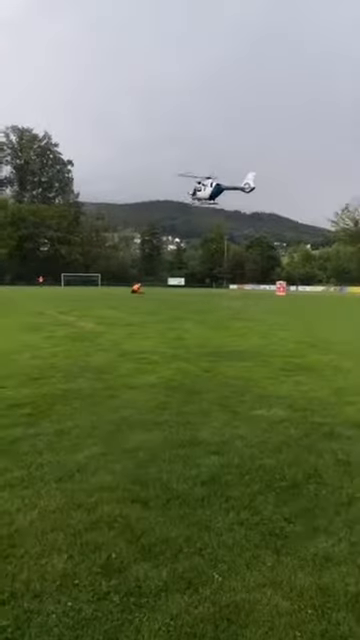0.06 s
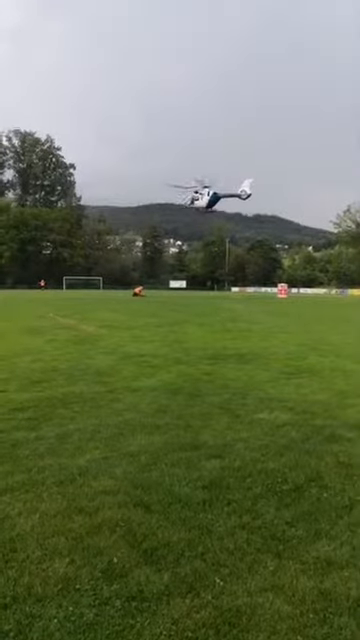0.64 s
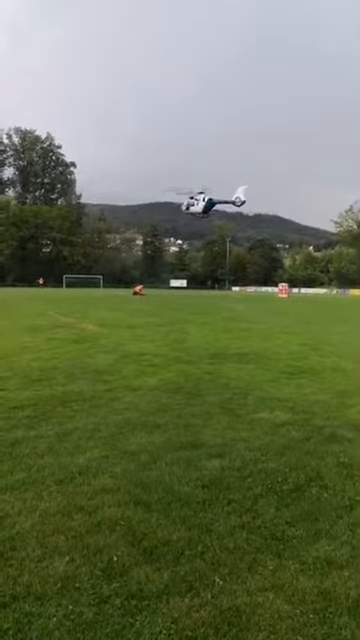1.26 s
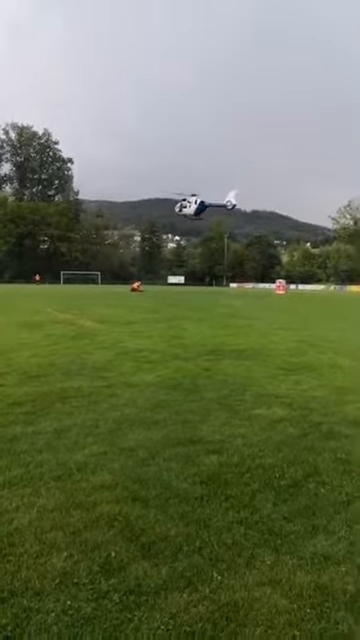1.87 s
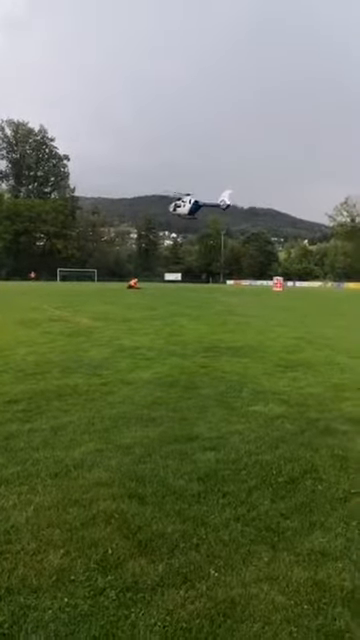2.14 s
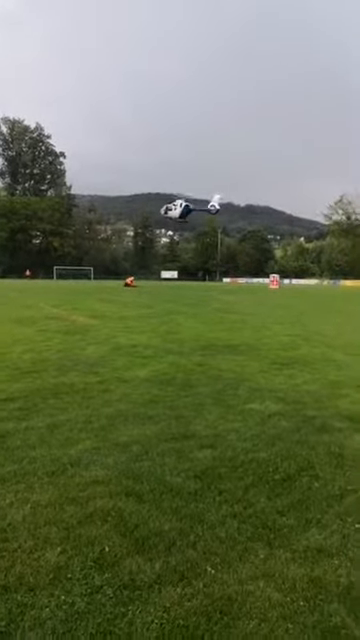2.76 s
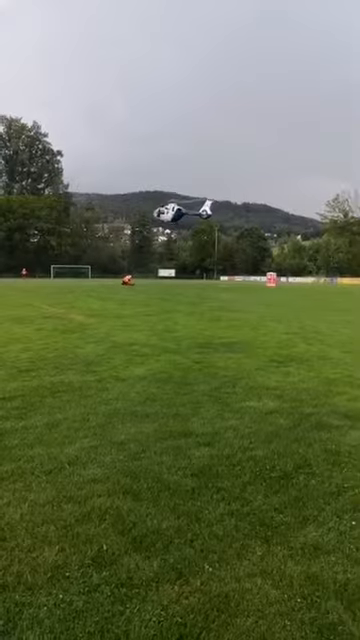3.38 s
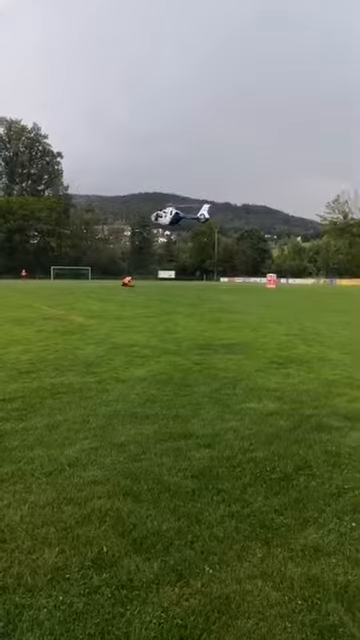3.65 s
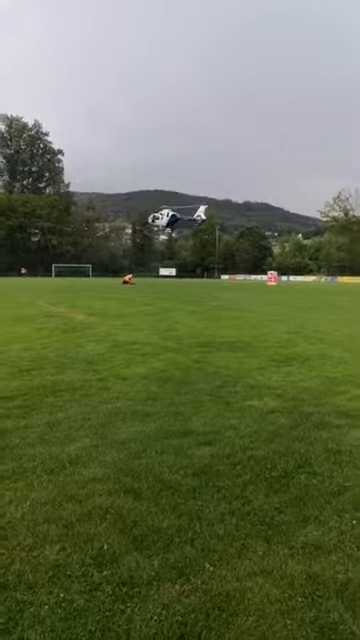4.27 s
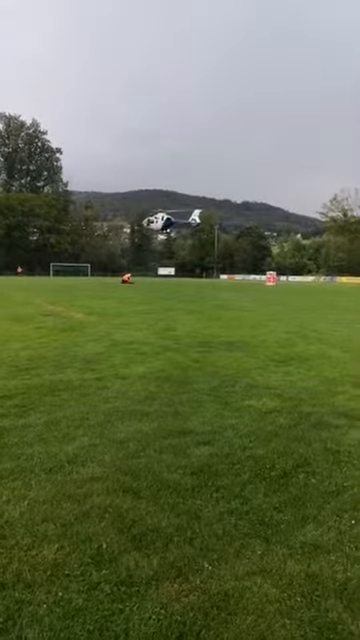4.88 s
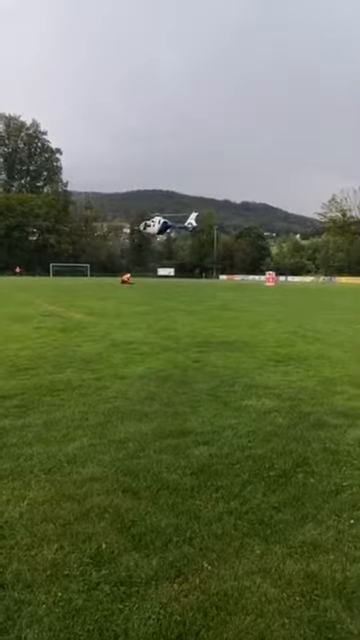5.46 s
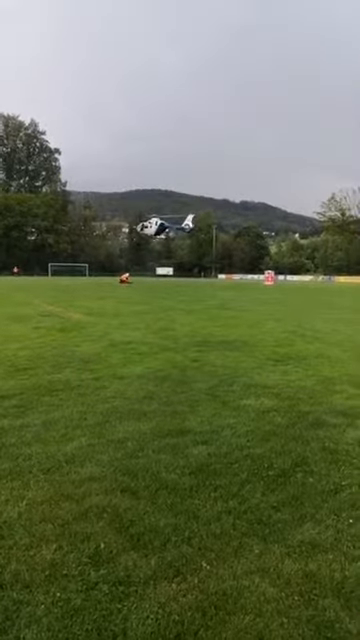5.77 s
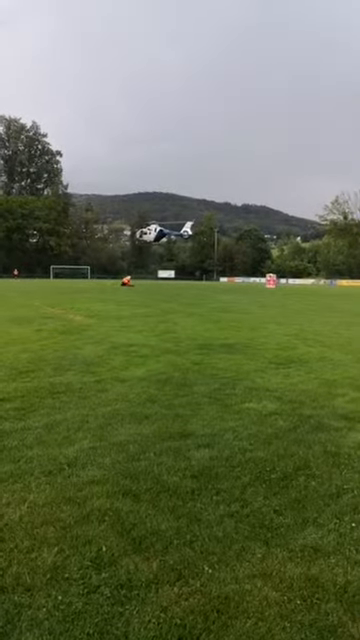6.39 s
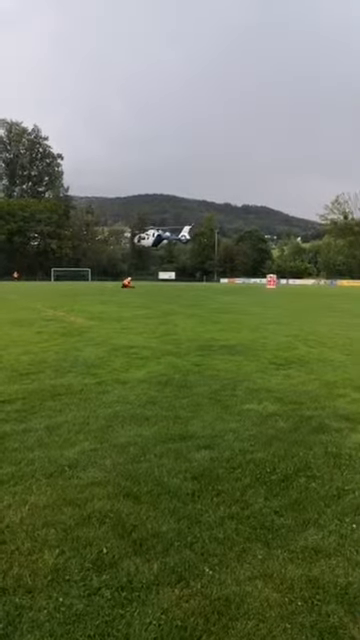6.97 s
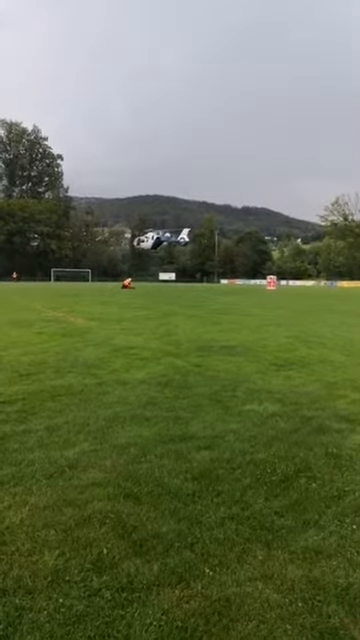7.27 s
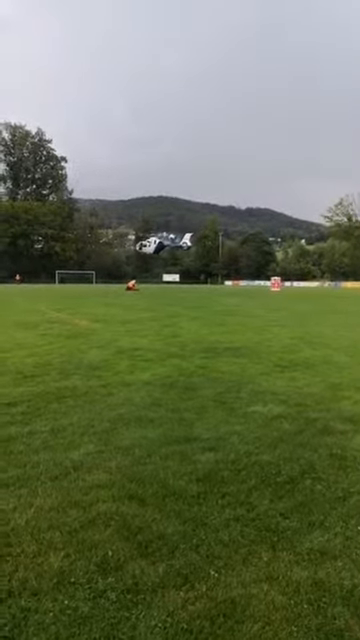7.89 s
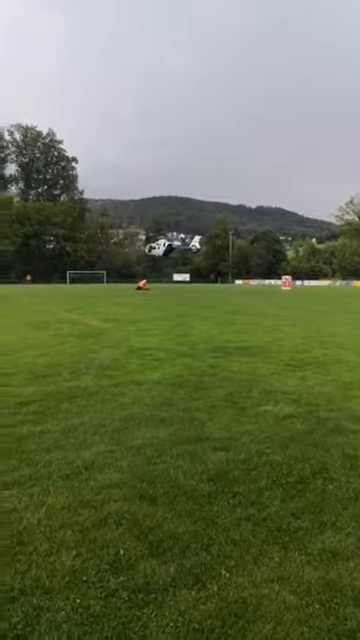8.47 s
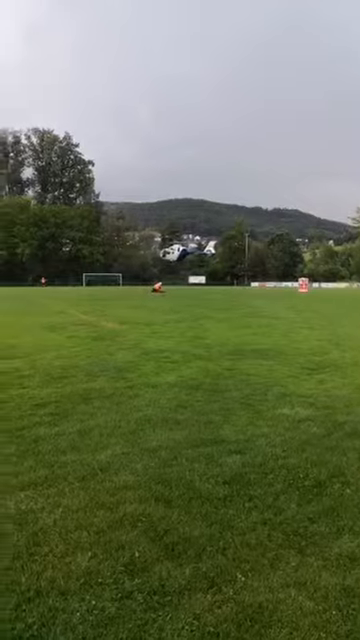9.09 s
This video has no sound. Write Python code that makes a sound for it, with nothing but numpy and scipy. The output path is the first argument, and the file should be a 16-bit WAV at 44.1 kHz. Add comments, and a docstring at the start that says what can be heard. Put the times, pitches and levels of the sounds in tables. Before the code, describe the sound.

A helicopter is heard throughout, low over an open field: a fast, even rotor chop with a low thump, swishing blade tips and an airy roar, topped by turbine hiss, a thin high whine and a faint hum. For the first 3 seconds or so, gusts buffet the microphone with low rumbles and thuds, and the blades add brief whistling ticks. Around 3.5 seconds the thump deepens in strength and the blades start slapping, with the sharpest knocks between 4 and 4.5 seconds. From about 5 seconds the turbines and swish grow softer and the wind drops to a light rumble. Hard, irregular slaps continue from about 5.5 to 8 seconds, with one more wind thud near 8. The helicopter is a little quieter but still chopping at the end, around 9 seconds. A faint dull echo comes from the field's edge.

```python
"""Rotor blades swish 27 times a second over a low thump, while gusts buffet the microphone.
A light twin-turbine helicopter is coming in low over a sports field, sinking to land at its far end.
Blade loading makes the thump, tip turbulence the swish, and blade-vortex interaction the hard slaps
that follow. The turbines hiss and whine, gears and tail fan hum, and the tree line echoes."""
import sys
import numpy as np
from scipy import signal
from scipy.fft import rfft, irfft
from scipy.io import wavfile

SR = 44100
rng = np.random.default_rng(int(sys.argv[2]) if len(sys.argv) > 2 else 0)


def persist_wave(psi):
    """Save psi, clipped to +-1, as 16-bit WAV."""
    counts = np.round(np.clip(psi, -1, 1) * 32767).astype(np.int16)
    wavfile.write(sys.argv[1], SR, np.atleast_2d(counts).T)


N = 407484
TIME = np.arange(N) / SR


# Rotor speed. Each row: time in seconds, blade passes per second.
PASS_RATE = [(0, 27.02), (1, 26.98), (2, 26.96), (3, 27.06), (4, 27.12), (5, 27.04), (6, 27.08), (7, 27.16),
             (8, 27.04), (9.24, 27.1)]
def blade_passes(offset_s=.0248):
    """Phase is the integral of rate: the times in seconds at which a blade sweeps by."""
    turned = np.cumsum(in_time(PASS_RATE)[0]) / SR
    return np.interp(np.arange(int(turned[-1])), turned, TIME) + offset_s


def rotor():
    """Aerodynamic sound: the blades radiate through their lift, their wake and their tips."""
    passes = blade_passes()
    wake = chop_resonances(slap(passes) + wake_roar())
    return thump(passes) + wake + hard_slaps() + blade_tips(passes) + tip_whistles()


# Blade load, greater in the flare before landing. Each row: time in seconds, thump level in dB.
BLADE_LOAD = [(0, -35.5), (1.95, -36.5), (2.3, -37), (3.1, -37), (3.65, -30.5), (4.2, -32.5), (4.9, -31.5),
              (5.6, -36.5), (6.4, -34), (7.4, -35.5), (8.3, -37), (8.85, -32), (9.24, -36)]
# Spectrum of the thump. Each row: frequency in Hz, relative density in dB.
THUMP_SPECTRUM = [(15, -23), (27, 0.5), (38, -18), (54, -3), (78, -2.5), (110, 4), (160, 2), (215, 2),
                  (290, -9), (420, -27), (800, -36)]
def thump(passes, jitter_s=.00011, uneven_db=1.2, rumble_db=-4, wander_s=.00063):
    """Loading noise: each blade's lift arrives as a low pressure pulse on the rumble of the downwash."""
    late, strong = rng.standard_normal((2, len(passes)))
    pulses = clicks(passes + .0034 + jitter_s * late, from_db(uneven_db * strong))
    # the ground scatters each pulse along shifting paths
    scatter = sum(from_db(db) * delayed(pulses, s + wander_s * drift(.91))
                  for s, db in [(.0125, -5), (.0278, -12)])
    rumble = from_db(rumble_db) * reflected(white(), THUMP_SPECTRUM)
    return gain(BLADE_LOAD) * rms_one(reflected(scatter - pulses, THUMP_SPECTRUM) + rumble)


# Tip vortices that each blade cuts. Each row: delay after the pass in seconds, relative level in dB.
TIP_VORTICES = [(-.0002, -4), (.0024, -4.5), (.0055, -5), (.0088, -5), (.012, -8.5), (.0155, -13)]
# How hard the blades cut their wake. Each row: time in seconds, slap level in dB.
SLAP_LEVEL = [(0, -34), (.9, -36.5), (1.25, -41), (1.6, -33.5), (2.55, -40), (2.88, -30), (3.1, -41),
              (3.6, -29.5), (3.95, -37.5), (4.18, -29), (4.55, -31.5), (4.9, -34), (5.45, -29),
              (5.65, -29.5), (5.85, -31), (6.04, -32), (6.25, -30), (6.75, -29.5), (7.05, -30.5),
              (7.22, -31.5), (7.42, -28), (7.65, -29), (7.95, -30), (8.27, -35), (8.55, -36.5),
              (8.8, -33.5), (9.08, -35.5), (9.24, -37)]
# Spectrum of the slap. Each row: frequency in Hz, relative density in dB.
SLAP_SPECTRUM = [(150, -12.5), (330, -14), (480, 3.5), (620, 4.5), (880, 4), (1200, -4.5), (1600, -15.5),
                 (2500, -12.5), (4500, -38), (9000, -53), (13000, -67)]
def slap(passes, wander_s=.0005, jitter_s=.00008, uneven_db=1.5, tear_db=-4):
    """Blade-vortex interaction: a blade cracks through wandering vortices and tears them into eddies."""
    cracks = np.zeros(N)
    for delay_s, level_db in TIP_VORTICES:
        late, strong = rng.standard_normal((2, len(passes)))
        wander = np.interp(passes, TIME, drift(.91))
        times = passes + delay_s + wander_s * wander + jitter_s * late
        cracks -= clicks(times, from_db(level_db + uneven_db * strong))
    tearing = bursts(passes, delay_s=-.0014, rise_s=.0043, uneven_db=.5)
    torn = from_db(tear_db) * reflected(white(tearing), SLAP_SPECTRUM)
    return gain(SLAP_LEVEL) * rms_one(reflected(cracks, SLAP_SPECTRUM) + torn)


# The hardest slaps. Each row: time in seconds, peak level in dB, pitch in Hz.
KNOCKS = [(3.6569, -21, 740), (3.6925, -17, 700), (4.0571, -9, 810), (4.1371, -11, 1190), (4.169, -11, 715),
          (4.2063, -14, 950), (4.357, -13, 1000), (4.432, -17, 800), (4.5482, -15, 900), (5.4339, -16, 870),
          (5.7956, -15.5, 910), (6.1325, -20, 800), (6.2033, -13, 750), (6.2415, -18, 900),
          (6.2778, -12, 775), (6.3155, -16, 864), (6.4254, -16, 620), (6.5343, -13.5, 730),
          (6.5735, -17, 820), (6.723, -18, 790), (6.9122, -15, 885), (7.014, -17, 750), (7.3821, -15, 714),
          (7.4196, -20, 720), (7.5319, -16, 730), (7.6031, -15, 820), (7.7511, -20, 740),
          (7.7876, -14.5, 700), (8.4202, -19, 900), (8.5304, -16, 1240), (8.642, -14.5, 1190),
          (8.7883, -17, 800), (9.0437, -14, 910), (9.082, -14, 800)]
def hard_slaps(half_s=.0009, crack_db=-16):
    """Impulsive loading: a vortex met head on gives a knock of a cycle or two, topped by a faint crack."""
    knocks = np.zeros(N)
    for s, peak_db, hz in KNOCKS:
        at = samples_near(s, 4 * half_s)
        age = TIME[at] - s
        knocks[at] += from_db(peak_db) * bell(age, half_s) * np.cos(2 * np.pi * hz * age)
    notch_hz, notch_width_hz, _ = REFLECTION_BANDS[1]
    knocks -= resonance(knocks, notch_hz, notch_width_hz)   # the ground cancels this band
    times, peaks_db, _ = np.transpose(KNOCKS)
    cracks = colour(clicks(times, from_db(peaks_db)), SWISH_SPECTRUM)
    return knocks + from_db(crack_db + peaks_db.max()) * cracks / np.abs(cracks).max()


# Strength of the wake's turbulence. Each row: time in seconds, level in dB.
ROAR_LEVEL = [(0, -26), (.55, -28), (.95, -26), (1.7, -31.5), (2.5, -30), (3.15, -31), (3.85, -28.5),
              (4.3, -33.5), (5.35, -27), (5.7, -31.5), (6.2, -30), (6.52, -36), (7.0, -32), (7.2, -35),
              (7.8, -31), (8.3, -41), (8.65, -39.5), (8.95, -35), (9.24, -35.5)]
# Spectrum of the roar. Each row: frequency in Hz, relative density in dB.
ROAR_SPECTRUM = [(120, -15), (330, -5.5), (500, -5), (680, 2.5), (900, 3), (1250, -2.5), (1600, -9.5),
                 (2200, -11), (4000, -51.5)]
def wake_roar(flicker_db=.35):
    """Broadband turbulence noise: the wake roars without a break."""
    return gain(ROAR_LEVEL) * from_db(flicker_db * drift(22)) * reflected(white(), ROAR_SPECTRUM)


# The chop turns brighter at times. Each row: time in seconds, lift of the bright band in dB.
BITE_LIFT = [(0, -3), (2.4, -4), (4.4, 8), (5.4, -1.5), (7.0, 3), (7.9, -3), (8.55, 8.5), (9.24, 4)]
# A hollow ring that rises as the craft sinks. Each row: time in seconds, centre in Hz, lift in dB.
HOLLOW_RING = [(0, 513, 6.5), (3.0, 530, 2), (3.8, 565, 6), (4.25, 573, 5), (4.65, 504, 8), (5.3, 500, -1),
               (5.7, 557, -2), (6.4, 590, 1), (6.7, 520, 3), (7.0, 615, -1), (7.6, 650, 1.5), (8.2, 650, 1),
               (9.24, 660, 0)]
def chop_resonances(wake):
    """Resonance shapes timbre: a fixed band gives the chop its bite, a moving one its hollow body."""
    wake = wake + (gain(BITE_LIFT) - 1) * resonance(wake, hz=1290, width_hz=460)
    ring_hz, ring_db = in_time(HOLLOW_RING)
    return wake + (from_db(ring_db) - 1) * moving_resonance(wake, ring_hz, width_hz=116)


# The swish runs ahead of the slap. Each row: time in seconds, lead in seconds.
TIP_LEAD = [(0, 0.0054), (1, 0.0022), (2, 0.0043), (3.6, 0), (4.5, 0.0029), (9.24, 0.00093)]
# The tips' rasp, which flares again just before landing. Each row: time in seconds, level in dB.
RASP_LEVEL = [(0, -47), (.7, -30.5), (1.25, -44), (1.7, -36), (2.5, -41.5), (3.1, -43), (3.65, -35.5),
              (4.7, -42), (5.6, -51), (6.4, -43.5), (7.5, -48), (8.4, -42.5), (8.8, -47), (9.0, -36),
              (9.24, -47)]
def blade_tips(passes):
    """Amplitude modulation: tip noise pulses with each pass, as a broad swish and a narrow rasp."""
    early = passes - np.interp(passes, *np.transpose(TIP_LEAD))
    sweep = bursts(early, delay_s=-.00032, rise_s=.0048, uneven_db=4)
    return swish(early) + gain(RASP_LEVEL) * narrow_noise(sweep, hz=1550, width_hz=380)


# The swish, loudest while the disc tilts towards the listener. Each row: time in seconds, level in dB.
SWISH_LEVEL = [(0, -39), (.4, -35), (.65, -39), (.9, -31), (1.25, -37), (1.7, -45), (2.0, -35),
               (2.45, -33.5), (2.8, -38), (3.1, -36), (3.65, -36.5), (4.3, -37.5), (4.7, -40), (5.6, -43),
               (6.4, -39), (8.4, -50), (9.0, -48), (9.24, -58)]
# Spectrum of the swish. Each row: frequency in Hz, relative density in dB.
SWISH_SPECTRUM = [(600, -1), (1200, -14), (1600, -7), (2500, -5), (3600, -0.5), (5000, -5.5), (7500, 4),
                  (10000, -14), (13000, -32)]
# Shedding bands. Each row: centre in Hz, width in Hz, level in dB relative to the broad hiss.
SHEDDING_BANDS = [(2000, 410, -9.5), (2530, 450, -9.5), (3690, 280, -11)]
def swish(passes, flicker_db=1.2):
    """Vortex shedding: each tip hisses past, with bands that flare differently on every pass."""
    sweep = bursts(passes, delay_s=.0003, rise_s=.0029, uneven_db=0)
    hiss = reflected(white(sweep), SWISH_SPECTRUM)
    for hz, width_hz, level_db in SHEDDING_BANDS:
        flare = bursts(passes, delay_s=.00018, rise_s=.0019, uneven_db=2.5)
        hiss += from_db(level_db) * narrow_noise(flare, hz, width_hz)
    return gain(SWISH_LEVEL) * from_db(flicker_db * drift(4.3)) * rms_one(hiss)


# Tip whistles. Each row: time in seconds, pitch in Hz, width in Hz, peak in dB, half length in seconds.
WHISTLES = [(.396, 1900, 1100, -23, .0025), (.433, 1700, 1100, -26, .0025), (0.474, 1700, 1100, -23, .0025),
            (0.506, 1700, 1100, -26, .0025), (.544, 2100, 1120, -25, .0025), (.581, 2000, 1200, -24, .0025),
            (0.621, 1900, 590, -21, 0.0062), (0.654, 3680, 400, -20.5, 0.0024),
            (.654, 1800, 1066, -23, 0.0031), (.693, 3780, 500, -27, .003), (0.727, 3000, 1200, -25, 0.0034),
            (.767, 2200, 1600, -21.5, 0.0021), (0.803, 2500, 2400, -20, .002),
            (0.837, 2200, 1510, -25.5, .0025), (.878, 4200, 2000, -20, 0.0025),
            (.916, 5840, 1980, -19, .003), (1.024, 6770, 1000, -23, .003), (1.026, 3500, 600, -24, .003),
            (1.22, 3530, 500, -20, 0.0028), (1.508, 2930, 250, -21, .003), (1.544, 3560, 450, -20.5, .003),
            (1.73, 3400, 500, -22, 0.0027), (1.77, 3530, 346, -21, 0.0023), (2.065, 3570, 448, -20.5, .003),
            (2.103, 3820, 620, -22, .003), (2.168, 2400, 597, -31, .003), (2.249, 3070, 350, -26, .003),
            (2.284, 1660, 700, -26, .003), (2.363, 2900, 900, -25, .003), (2.399, 1670, 697, -20, .003),
            (2.512, 2670, 361, -21, .003), (2.547, 2590, 302, -19, 0.0028), (2.586, 3670, 400, -24, .003),
            (2.916, 7100, 401, -18, 0.0038), (3.253, 1727, 304, -20.5, 0.0038),
            (3.619, 1565, 202, -16.5, 0.0028), (3.696, 2740, 900, -27, .003),
            (4.726, 2180, 880, -16.5, 0.0022), (5.2, 2850, 446, -28.5, 0.028),
            (6.855, 3550, 400, -28, 0.019)]
def tip_whistles():
    """Aeolian tones: shed vortices whistle briefly; phase diffusion turns the less steady into ticks."""
    out = np.zeros(N)
    random_walk = np.cumsum(rng.standard_normal(N))
    for s, hz, width_hz, peak_db, half_s in WHISTLES:
        at = samples_near(s, 4 * half_s)
        unsteady = np.sqrt(2 * np.pi * width_hz / SR) * random_walk[at]
        swell = from_db(peak_db) * bell(TIME[at] - s, half_s)
        out[at] += swell * np.sin(2 * np.pi * hz * TIME[at] + unsteady)
    return out


# The engines fade as the craft sinks. Each row: time in seconds, intake level in dB, exhaust level in dB.
ENGINE_LEVELS = [(0, -27.5, -31), (.8, -26, -29.5), (1.5, -25.5, -29.5), (2.1, -28, -31), (2.8, -28, -30),
                 (3.2, -27.5, -30.5), (3.95, -26.5, -28.5), (4.6, -27.5, -28), (5.15, -30.3, -29.5),
                 (5.7, -32.5, -32), (6.8, -33.5, -33.5), (7.4, -33, -32.5), (8.1, -33.5, -33.5),
                 (9.24, -33, -34)]
# Spectra of the intake and the compressor. Each row: frequency in Hz, relative density in dB.
INTAKE_SPECTRUM = [(3500, -30), (5200, -10), (6500, -4.5), (7000, 1.5), (7300, 2), (7900, -1), (8700, -6.5),
                   (10000, -13), (11500, -21.5), (12600, -26), (14000, -73)]
COMPRESSOR_SPECTRUM = [(12400, -46), (12800, -16), (13000, -14), (13100, -6), (13170, 1), (13300, -12),
                       (13480, -22), (13650, -50)]
def turbines(flutter_db=.5, chop_db=.5, mesh_db=-17):
    """Flow noise and machine tones: intake hiss, whine smeared by hot air, exhaust, a faint gear mesh."""
    intake_db, exhaust_db = in_time(ENGINE_LEVELS)
    sweep = rms_one(bursts(blade_passes(), delay_s=-.0027, rise_s=.0021, uneven_db=4))
    # eddies on the way make the treble flutter, and each passing blade lifts it a little
    air_db = flutter_db * drift(9.8) + chop_db * (sweep - sweep.mean())
    hiss = from_db(intake_db + air_db) * colour(white(), INTAKE_SPECTRUM)
    whine_db = -38 + 1.13 * (intake_db + 27) + 1.1 * drift(10)   # follows the intake, a little steeper
    whine = from_db(whine_db + air_db) * colour(white(), COMPRESSOR_SPECTRUM)
    rush = from_db(exhaust_db + air_db) * exhaust()
    mesh = from_db(exhaust_db + mesh_db + 3 * drift(6)) * narrow_noise(1, hz=3600, width_hz=540)
    return hiss + whine + rush + mesh


# Spectrum of the exhaust. Each row: frequency in Hz, relative density in dB.
EXHAUST_SPECTRUM = [(900, -9.5), (1600, 1.5), (2500, 0), (3500, -3), (4600, -1.5), (6000, -0.5),
                    (9000, -12.5), (13000, -52)]
# Its bright bands. Each row: centre in Hz, width in Hz.
EXHAUST_BANDS = [(2040, 490), (2650, 280), (2950, 86), (3600, 250)]
def exhaust(waver_db=1.8, lift_db=.95):
    """Jet noise: a broad rush whose bright bands swell and fade in the moving air."""
    rush = reflected(white(), EXHAUST_SPECTRUM)
    bands = sum((from_db(lift_db + waver_db * drift(3.4)) - 1) * resonance(rush, hz, width_hz)
                for hz, width_hz in EXHAUST_BANDS)
    return rms_one(rush + bands)


# Gear and tail fan tones. Each row: pitch in Hz, relative level in dB, waver as a fraction of the pitch.
GEAR_TONES = [(489.5, -1, .0018), (857.5, 2.2, .002), (876.5, 1.5, .002), (612, -2, .0025)]
# Strength of the whole hum. Each row: time in seconds, gain in dB.
HUM_LEVEL = [(0, -37), (2, -43), (3.3, -45), (4.8, -69), (9.24, -46.5)]
def gears_and_fan(fading_db=2.5, rough_db=-13):
    """Periodic forcing: tones geared to the rotor waver and fade in the moving air."""
    rate = in_time(PASS_RATE)[0]
    speed = rate / rate.mean()
    hum = from_db(rough_db) * narrow_noise(1, hz=847, width_hz=77)   # the tail fan's rough band
    for hz, level_db, waver in GEAR_TONES:
        phase = 2 * np.pi * np.cumsum(hz * speed * (1 + waver * drift(13))) / SR
        hum += from_db(level_db) * rms_one(np.sin(phase) * from_db(fading_db * drift(8.2)))
    return gain(HUM_LEVEL) * hum


# Bands lifted or cancelled by a near reflection. Each row: centre in Hz, width in Hz, gain in dB.
REFLECTION_BANDS = [(290, 14, -7), (395, 20, -8), (701, 33, -3.5), (1035, 15, -5), (1228, 57, 3),
                    (1460, 27, -3.5), (1567, 116, 2), (1816, 55, -5.5), (2060, 120, 1), (2270, 36, -4.5),
                    (2644, 61, 2.5), (3315, 34, -8), (3450, 320, 4)]
def reflected(x, spectrum):
    """Interference: x takes on the spectrum, rippled by a near reflection, at unit power."""
    return colour(x, spectrum, REFLECTION_BANDS)


# The grass bounce's band climbs as the craft sinks. Each row: time in seconds, centre in Hz, gain in dB.
GRASS_BOUNCE = [(0, 330, -2.5), (3.2, 310, 3), (4.1, 305, -7), (4.8, 295, 1), (5.3, 400, -2),
                (5.8, 435, -5), (6.5, 400, -2), (7.3, 430, -3), (8.0, 480, -2), (8.7, 380, -5),
                (9.24, 360, -4)]
# Echoes from the tree line and banks. Each row: delay in seconds, gain in dB.
FIELD_ECHOES = [(.061, -12.5), (0.129, -21.5), (.203, -30.5), (.317, -21.5)]
def field(x, leaves_hz=2500):
    """Ground effect and echo: the grass bounce mostly hollows one band; the field's edge answers dully."""
    dip_hz, dip_db = in_time(GRASS_BOUNCE)
    x = x + (from_db(dip_db) - 1) * moving_resonance(x, dip_hz, width_hz=95)
    dull = signal.sosfilt(signal.butter(1, leaves_hz, fs=SR, output="sos"), x)
    return x + sum(from_db(db) * delayed(dull, s) for s, db in FIELD_ECHOES)


# The breeze between gusts. Each row: time in seconds, level in dB.
BREEZE_LEVEL = [(0, -29), (.28, -31), (.5, -31), (1.0, -30.5), (1.5, -38), (1.75, -33.5), (2.05, -39),
                (2.25, -29.5), (2.75, -27), (2.97, -35), (3.15, -38), (3.4, -32.5), (4.6, -31), (5.7, -40),
                (6.5, -39), (8.4, -40), (9.24, -34.5)]
# Gusts. Each row: start in seconds, length in seconds, level in dB.
WIND_GUSTS = [(0, 0.22, -27), (0.35, .09, -32), (0.525, 0.105, -26.5), (.91, 0.098, -33), (1.06, 0.46, -24),
              (1.533, 0.044, -31), (1.614, 0.035, -25), (2.145, 0.026, -25.5), (2.2, .025, -28),
              (2.334, 0.055, -23), (2.44, 0.037, -26), (2.55, .04, -37), (2.634, .03, -36),
              (2.676, 0.13, -28), (2.83, 0.034, -32), (3.208, 0.052, -28), (3.308, .05, -28.5),
              (3.48, 0.054, -29.5), (3.618, .08, -30.5), (5.38, 0.092, -32.5)]
# Spectra of brisk and of slack wind. Each row: frequency in Hz, relative density in dB.
BRISK_SPECTRUM = [(12, -19), (30, -9), (60, -3.5), (130, 0), (230, -0.5), (350, -2.5), (520, -5.5),
                  (900, -15.5), (2500, -52), (6000, -98)]
SLACK_SPECTRUM = [(12, -18), (30, -8), (60, -6), (130, 0.5), (220, -3.5), (280, -5.5), (380, -12),
                  (900, -36), (2500, -64)]
def wind(lumpy_db=2, attack_s=.03, release_s=.031, brisk_db=-30.5):
    """Turbulent pressure at the microphone: breeze and gusts add in power, and eddies break in lumps."""
    power = gain(BREEZE_LEVEL) ** 2
    for s, length_s, db in WIND_GUSTS:
        corners = [s - attack_s, s, s + length_s, s + length_s + release_s]
        power += (from_db(db) * np.interp(TIME, corners, [0, 1, 1, 0])) ** 2
    lumps = from_db(lumpy_db * drift(35))
    brisk = np.clip(power / from_db(brisk_db) ** 2, 0, 1)   # below brisk_db the rush gives way to rumble
    rush = np.sqrt(power * brisk) * colour(white(lumps), BRISK_SPECTRUM)
    rumble = np.sqrt(power * (1 - brisk)) * colour(white(lumps), SLACK_SPECTRUM)
    return rush + rumble


# The biggest eddies. Each row: time in seconds, level in dB, half length in seconds.
BIG_EDDIES = [(0.616, -28, .016), (0.984, -27, 0.047), (1.37, -28, 0.041), (1.628, -28, 0.016),
              (2.156, -26, 0.012), (2.385, -27, 0.025), (2.69, -29, 0.016), (7.787, -28.5, 0.042),
              (8.08, -37, 0.14)]
# Spectrum of their thud. Each row: frequency in Hz, relative density in dB.
THUD_SPECTRUM = [(15, -10), (35, 2), (55, 3), (85, 4), (140, -0.5), (400, -43)]
def buffets():
    """Large eddies make slow pressure swings: each thuds on the microphone."""
    swell = sum(from_db(db) * bell(TIME - s, half_s) for s, db, half_s in BIG_EDDIES)
    return swell * colour(white(), THUD_SPECTRUM)


def from_db(db):
    """Decibels to amplitude ratio."""
    return 10 ** (np.asarray(db) / 20)


def rms_one(x):
    """Normalisation to unit power."""
    return x / np.sqrt(np.mean(x ** 2) + 1e-20)


def in_time(rows):
    """Linear interpolation of each column of a timed table to every sample."""
    s, *columns = np.transpose(rows)
    return [np.interp(TIME, s, c) for c in columns]


def gain(rows):
    """A timed table of decibels as an amplitude envelope."""
    return from_db(in_time(rows)[0])


def bell(x, spread):
    """A Gaussian of height 1."""
    return np.exp(-.5 * (x / spread) ** 2)


def samples_near(s, reach_s):
    """Sample indices within reach_s of time s."""
    return np.arange(int((s - reach_s) * SR), int((s + reach_s) * SR))


def delayed(x, s):
    """Propagation delay of s seconds, fixed or varying."""
    return np.interp(TIME - s, TIME, x, left=0)


def drift(rate):
    """Low-passed noise: a wander of spread 1 that changes about `rate` times a second."""
    pole = np.exp(-200 * np.pi * rate / SR)
    steps = rng.standard_normal(N // 100 + 2002)   # one per 100 samples, plus time to settle
    slow = signal.lfilter([1], [1, -2 * pole, pole * pole], steps)[2000:]
    return np.interp(np.arange(N) / 100, np.arange(len(slow)), rms_one(slow))


def white(gate=1):
    """White noise under an envelope."""
    return gate * rng.standard_normal(N)


def clicks(times, sizes):
    """One impulse at each time."""
    at = np.round(times * SR).astype(int)
    inside = (at >= 0) & (at < N)
    return np.bincount(at[inside], sizes[inside], N)


def bursts(passes, delay_s, rise_s, uneven_db):
    """A critically damped envelope that swells and dies with each pass."""
    pole = np.exp(-1 / (rise_s * SR))
    sizes = from_db(uneven_db * rng.standard_normal(len(passes)))
    return signal.lfilter([1], [1, -2 * pole, pole * pole], clicks(passes + delay_s, sizes) + 1e-18)


def colour(x, spectrum, ripple=(), size=8192):
    """Minimum-phase filtering by a spectrum with bell-shaped bumps; unit power out."""
    hz = np.maximum(np.arange(size // 2 + 1) * SR / size, 1)
    points_hz, points_db = np.transpose(spectrum)
    db = np.interp(np.log(hz), np.log(points_hz), points_db)
    for centre, width, bump_db in ripple:
        db += bump_db * bell(hz - centre, width)
    cepstrum = irfft(np.log(from_db(db)))[:size // 2]
    cepstrum[1:] *= 2   # folding the cepstrum gives minimum phase
    response = irfft(np.exp(rfft(cepstrum, size)))
    return rms_one(signal.oaconvolve(x, response)[:N])


def resonance(x, hz, width_hz):
    """A second-order resonator with peak gain 1."""
    return signal.lfilter(*signal.iirpeak(hz, hz / width_hz, fs=SR), x)


def narrow_noise(gate, hz, width_hz):
    """Narrow-band noise: gated turbulence twice through one resonator, at unit power."""
    return rms_one(resonance(resonance(white(gate), hz, width_hz), hz, width_hz))


def moving_resonance(x, hz, width_hz, size=512):
    """A resonator whose centre follows a curve, block by block."""
    out, state = np.zeros(N), np.zeros(2)
    for i in range(0, N, size):
        b, a = signal.iirpeak(hz[i], hz[i] / width_hz, fs=SR)
        out[i:i + size], state = signal.lfilter(b, a, x[i:i + size], zi=state)
    return out


def scene():
    """Superposition: the helicopter across the field, and wind close by."""
    helicopter = rotor() + turbines() + gears_and_fan()
    return (field(helicopter) + wind() + buffets())[None]


def record(dry):
    """Band limiting: the deepest bass and the highest treble are cut."""
    bass_cut = signal.butter(2, 18, "high", fs=SR, output="sos")
    top_cut = signal.cheby2(16, 70, 14500, fs=SR, output="sos")
    return signal.sosfilt(top_cut, signal.sosfilt(bass_cut, dry))


dry = scene()
out = record(dry)
persist_wave(out)
```